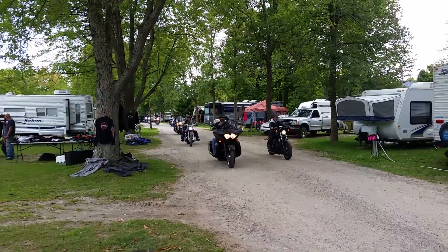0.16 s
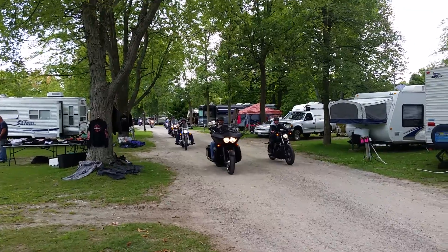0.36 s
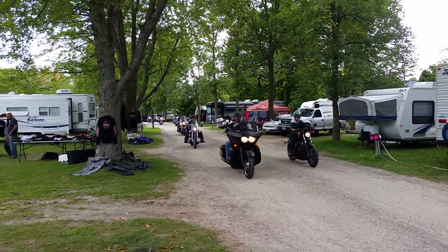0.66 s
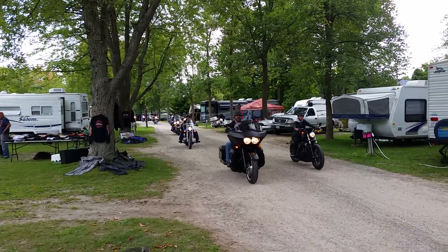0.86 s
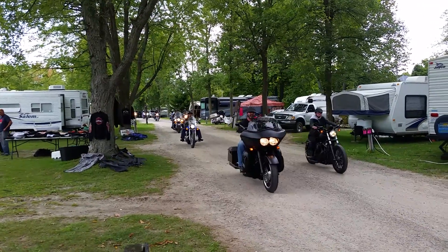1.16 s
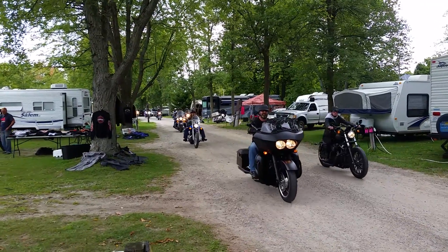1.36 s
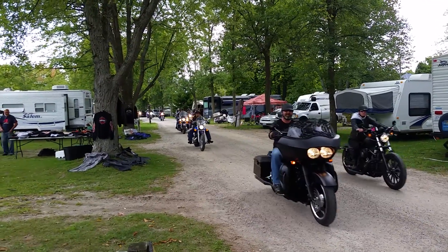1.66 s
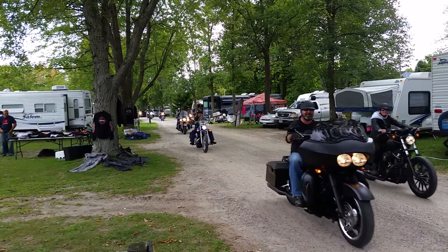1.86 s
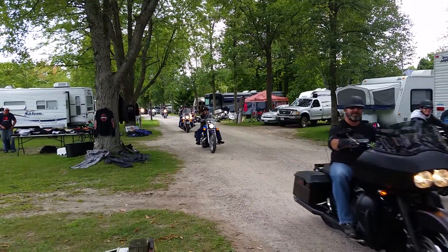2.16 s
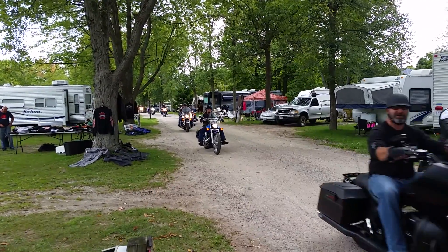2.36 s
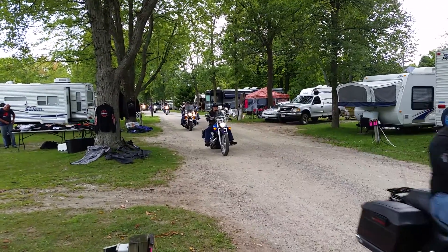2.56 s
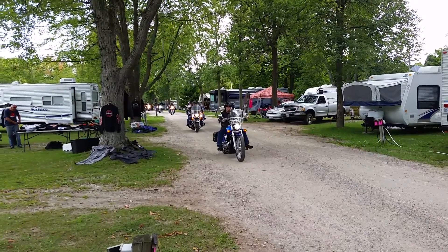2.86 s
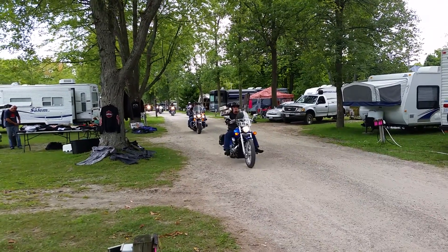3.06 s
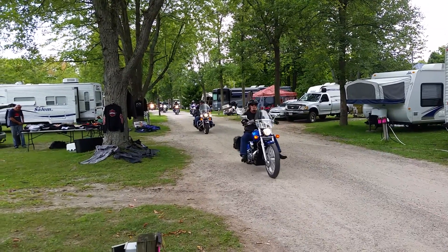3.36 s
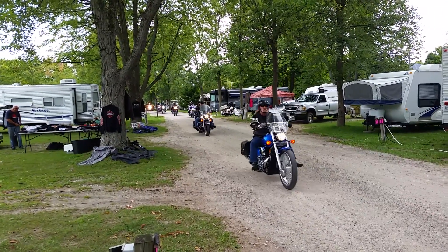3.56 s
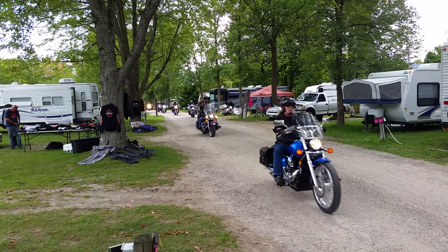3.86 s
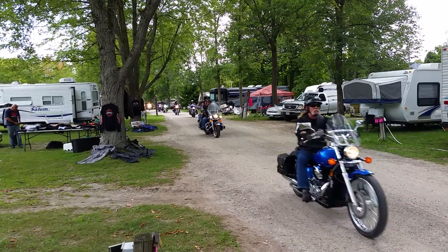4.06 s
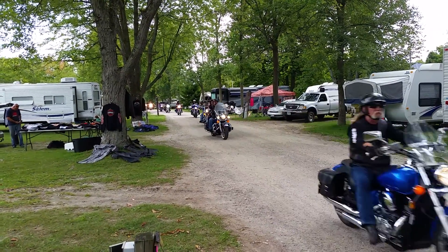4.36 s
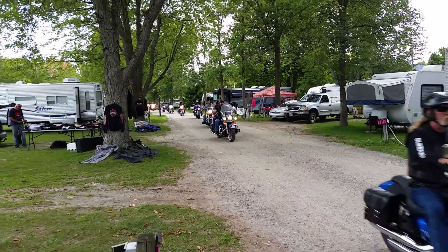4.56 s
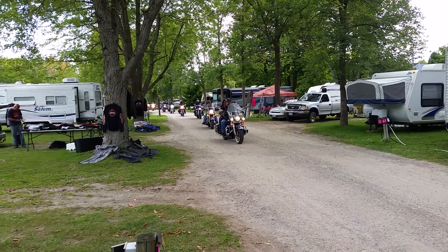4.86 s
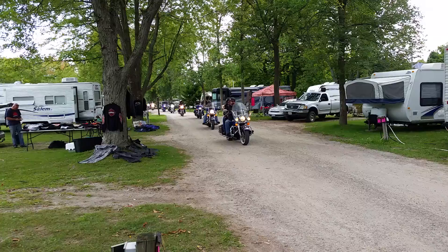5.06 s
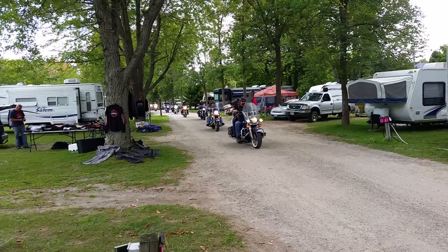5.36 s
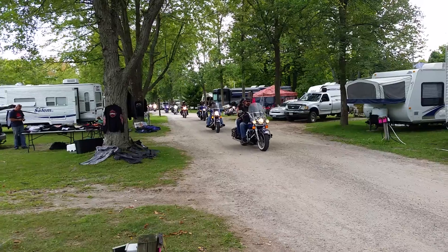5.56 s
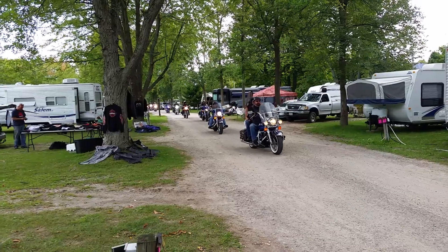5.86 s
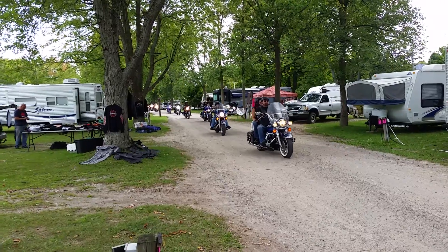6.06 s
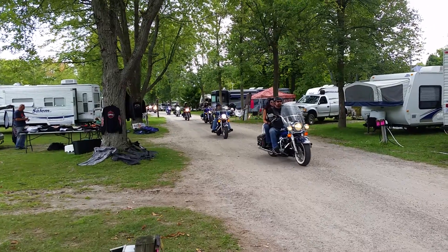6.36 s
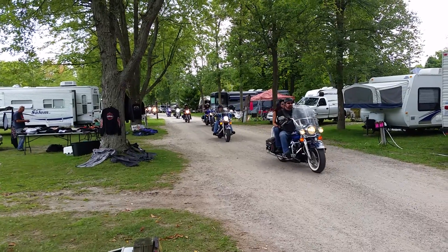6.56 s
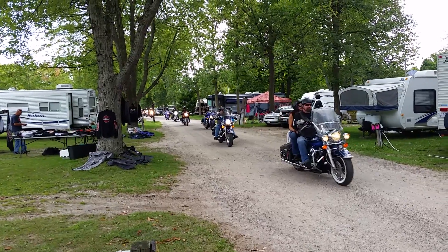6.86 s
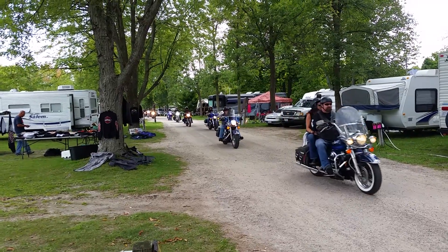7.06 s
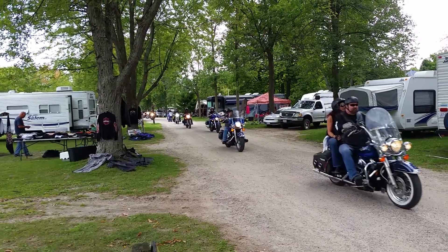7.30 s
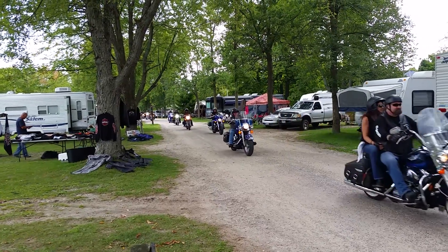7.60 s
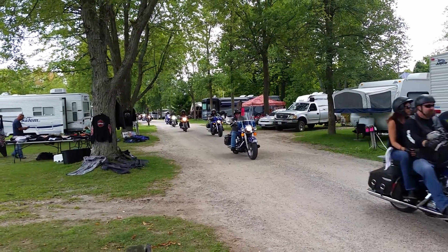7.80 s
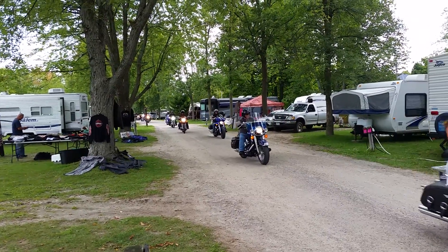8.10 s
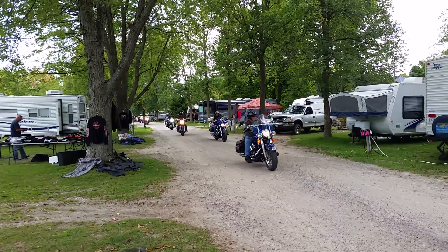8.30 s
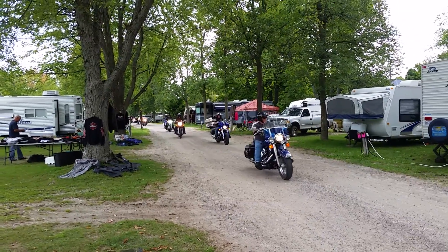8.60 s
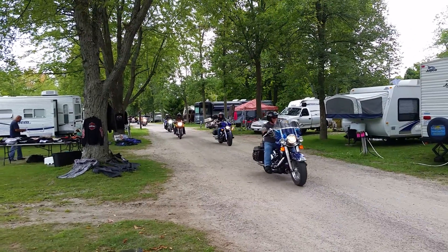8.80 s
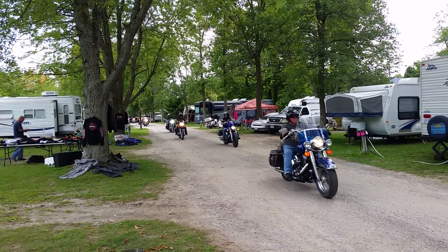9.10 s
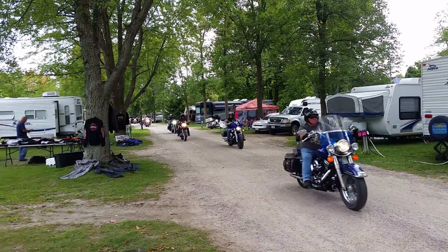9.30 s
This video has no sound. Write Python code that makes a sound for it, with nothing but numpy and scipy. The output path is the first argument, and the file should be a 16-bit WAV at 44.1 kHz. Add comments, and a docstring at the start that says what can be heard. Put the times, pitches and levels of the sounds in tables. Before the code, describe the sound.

A stereo microphone stands close beside a gravel lane outdoors as a column of big twin-cylinder motorcycles rolls slowly past. From 0 s, thick overlapping rumble: uneven paired exhaust beats, about twenty a second, with deep thumps, dull crankcase knocks, muffler barks and clatter. The beats weaken and skip around 2 to 2.6 s, with a short bark at 2.6 s. From 2.8 s the nearest bike grows strong, its puffs loudest and sharpest around 3 to 4.5 s. Then the bass drops as it goes away, leaving crisp, spitting, whistling chuffs with missed beats until about 6.3 s. A quieter lull follows near 6.7 s. From 7 s the next bike approaches, thumps and hard knocks building, extra barks near 8 s, full rumble to 9.4 s. Distant engines drone low throughout, with faint gravel hiss and short echoes.

```python
"""Gravel lane: a column of big twin-cylinder motorcycles rolls slowly past the listener.
Whichever bike is nearest, first one and then the next, chuffs unevenly with weak or skipped beats: noise
puffs, barks, knocks, header rings. A duller bike knocks beside it, others thump just behind; every blow rings
a filter shaped as a pipe. Twin-cylinder clicks at several rates make the rest of the column and pulse its
growl, knock, clatter and tyre hiss over a steady low roar; extra engine barks and knocks ring briefly."""
import sys
import numpy as np
from scipy import signal
from scipy.fft import rfft, irfft
from scipy.io import wavfile
from scipy.ndimage import uniform_filter1d

SR = 44100
rng = np.random.default_rng(int(sys.argv[2]) if len(sys.argv) > 2 else 0)


def master(y):
    """Save y as 16-bit WAV."""
    cut = np.clip(np.atleast_2d(y).T, -1, 1)
    pcm = np.round(cut * 32767)  # scale
    wavfile.write(sys.argv[1], SR, pcm.astype(np.int16))


N = 416304
T = np.arange(N) / SR
TWIN_GAP = 315 / 720  # short firing gap as a share of the engine cycle
BIKE_SPREAD_DB = 2.5  # chance change from beat to beat, bikes beside and behind
PEAK_DELAY_S = .003  # per-beat pitches are reached this long after the beat

# The column. Each row: time in seconds, thump in relative dB, treble in dB, knock pitch in Hz, growl in dB.
COLUMN = [(0, -13.5, -39, 710, -36.5), (.45, -9.5, -35, 750, -39.5), (1.1, -10.5, -36, 750, -32.5),
          (1.5, -12, -39.5, 657, -39), (2.3, -12.5, -41, 650, -33.5), (2.75, -12, -40.5, 718, -31.5),
          (3.5, -15.5, -40.5, 774.7, -37), (4.1, -20, -54, 556, -30.5), (4.5, -17.5, -57, 642.7, -33.5),
          (5, -20, -49, 675, -41), (5.7, -21, -48, 670, -39.5), (6.08, -19.5, -42, 625, -38),
          (6.3, -21.5, -45.5, 640, -44), (6.86, -17, -43.5, 636, -38.5), (7.3, -12.5, -40, 633, -32.5),
          (8, -10.5, -38, 644.5, -37.5), (8.7, -12, -39, 696, -36.5), (9.44, -12, -42, 654, -35)]
# Exhaust thump spectra of the bikes coming, the bike going away, the next group.
# Each row: frequency in Hz, density in relative dB per Hz.
PIPE_SPECTRA = [
    [(15, -62), (25, -41), (47, -10), (83, -1.5), (102, 1.5), (139, -2.5), (221, -15.5), (285, -19.5),
     (403, -40.5), (505, -51), (600, -32), (780, -79), (1320, -120)],
    [(15, -62), (25, -64), (43, -11), (74, -1), (97, 2.5), (122, -1), (145, -5.5), (172, -7.5),
     (263, -13.5), (305, -30), (377, -27), (600, -41.5), (780, -68), (1320, -120)],
    [(15, -30), (25, -50), (54, -1.5), (75, 0.5), (100, 4.5), (130, -3), (227, -13), (267, -11.5),
     (387, -37.5), (518, -51), (600, -27.5), (780, -76), (1320, -120)],
]
# Muffler shell spectrum. Each row: frequency in Hz, density in relative dB per Hz.
BARK_SPECTRUM = [(1200, -37), (1700, 2.5), (2300, 1), (2800, 0.5), (3600, -16)]
# Crankcase spectrum. Each row: frequency in Hz, density in relative dB per Hz.
KNOCK_SPECTRUM = [(350, -4.5), (500, -4), (620, -6.5), (800, -4), (1000, -6), (1500, -2), (2000, -15.5)]


def gain_of(db):
    """Amplitude factor of a level in dB."""
    return 10 ** (np.asarray(db) / 20)


def evened(x):
    """Scales to rms 1, over all channels together."""
    return x / np.sqrt(np.mean(x ** 2) + 1e-20)


def read(points, hz):
    """Reads a frequency table, linear in log frequency."""
    table_hz, value = np.transpose(points)
    return np.interp(np.log(hz + 1), np.log(table_hz + 1), value)


def along(rows, t=T):
    """Reads the columns of a time table, linear in time."""
    s, *columns = np.transpose(rows)
    return [np.interp(t, s, column) for column in columns]


def coloured(points):
    """Two unrelated noises with the given spectrum."""
    spectrum = rfft(rng.standard_normal((2, N)))
    gain = gain_of(read(points, np.fft.rfftfreq(N, 1 / SR)))
    return evened(irfft(spectrum * gain, N))


def resonate(x, hz, width_hz):
    """Shifts the curve hz down to zero, smooths, and shifts back: a click rings at height 1."""
    turn = np.exp(2j * np.pi * np.cumsum(hz) / SR)
    decay = np.exp(-np.pi * width_hz / SR)
    return (turn * signal.lfilter([1], [1, -decay], x / turn)).real


def burst(rise_s, fall_s, tail_db, tail_s):
    """Envelope of escaping gas: quick swell, quick fall, a weaker trail."""
    t = np.arange(3000) / SR
    late = np.maximum(t - rise_s, 0)
    fall = np.exp(-late / fall_s) + gain_of(tail_db) * np.exp(-late / tail_s)
    return np.minimum(t / rise_s, 1) ** 2 * fall


def train(s, size):
    """Clicks of the given sizes at the given times."""
    at = np.round(s * SR).astype(int)
    keep = (at >= 0) & (at < N)
    return np.bincount(at[keep], size[keep], N)


def twin(rate, uneven_db, wander, gap=TWIN_GAP):
    """Firing clicks of a twin: a short gap, then a long one, each of its own strength."""
    drift = evened(uniform_filter1d(uniform_filter1d(rng.standard_normal(N), 9000), 9000))
    cycles = np.cumsum(rate * (1 + wander * drift)) / (2 * SR) + rng.random()  # two beats a cycle
    first = np.diff(np.floor(cycles), prepend=0) > 0
    second = np.diff(np.floor(cycles - gap), prepend=-1) > 0
    return evened((first | second) * gain_of(uneven_db * rng.standard_normal(N)))


def steady(noise):
    """Noise with its slower chance swells taken out."""
    stroke_s = .005  # within this span a gust keeps an even strength
    power = abs(uniform_filter1d(noise ** 2, size=round(stroke_s * SR)))
    return noise / np.sqrt(power + 1e-3)


def gusts(noise, s, db, shape):
    """Noise let through by one envelope at each beat."""
    return steady(noise) * signal.oaconvolve(train(s - .0015, gain_of(db)), shape)[:N]


def ports(pair, likeness, size=256):
    """Right port hears the first sound; the left hears it later, mixed with the second, through the housing."""
    # Each row: time in seconds, full lag of the left port in ms.
    lag = [(0, 0.036), (2.8, 0.32), (3.6, 0.6), (5, 0.35), (5.7, 0.41), (6.1, 0.13), (6.7, 0.16),
           (7.3, 0.29), (8.2, 0.35), (9.44, 0.58)]
    # Bass bends round the housing. Each row: frequency in Hz, share of the full lag.
    lag_share = [(100, 0.25), (500, 0.55), (1000, 0.48), (2000, 0.79)]
    # Each row: frequency in Hz, left minus right in dB.
    port_tilt = [(60, 0), (200, 0), (380, 0.6), (700, 0), (1290, 5), (2380, 8), (4400, -2), (8120, -1),
                 (15000, -2)]
    # Each row: frequency in Hz, left-right likeness (0 to 1) when the likeness argument is 1.
    base_likeness = [(60, 0.97), (130, 0.99), (300, 0.92), (700, 0.95), (1500, 0.64), (2500, 0.64),
                     (4500, 0.28), (15000, 0.17)]
    overlap = size * 3 // 4
    hz, t, (a, b) = signal.stft(pair, SR, nperseg=size, noverlap=overlap)
    same = np.clip(read(base_likeness, hz)[:, None], 0, 1) ** (1 / likeness)
    lag_s = along(lag, t)[0] / 1000
    late = np.exp(-2j * np.pi * (hz * read(lag_share, hz))[:, None] * lag_s)
    tilt = gain_of(read(port_tilt, hz)[:, None] / 2)
    left = (same * a * late + np.sqrt(1 - same ** 2) * b) * tilt
    right = a / tilt
    return signal.istft([left, right], SR, nperseg=size, noverlap=overlap)[1][:, :N]


def spit(shift=1):
    """Edge noise of the gas jet, strongest around its moving peak."""
    # Each row: frequency in Hz, density in relative dB per Hz.
    edge_spectrum = [(6500, -14), (8300, 1), (9200, 4.5), (12200, 6), (14000, 4), (16000, 9)]
    # Its moving peak. Each row: time in seconds, frequency in Hz before any shift.
    edge_peak = [(0, 11900), (.8, 13300), (2.6, 11700), (3.7, 12500), (5.7, 12400), (7.2, 10900),
                 (9.44, 8900)]
    noise = coloured(edge_spectrum)
    peak = evened(resonate(noise, shift * along(edge_peak)[0], 2400))
    return evened(noise + 0.96 * peak)


def column():
    """Several engines at their own speeds; their beats also pulse the growl, knock, clatter and hiss."""
    # Beats per second of each engine.
    engine_rates = [14.5, 16.7, 21]
    # Knock law: knock in dB at a thump of loud_db, then knock dB per dB of thump.
    knock_law = (-36.5, 1.05)
    # Upper pipe ring. Each row: frequency in Hz, density in relative dB per Hz.
    growl_spectrum = [(240, -49), (300, 5.5), (380, 3), (480, -6.5), (600, -24)]
    # Tyres on gravel. Each row: frequency in Hz, density in relative dB per Hz.
    hiss_spectrum = [(2200, -66), (3000, 3.5), (4400, 0.5), (5700, -6), (7000, -0.5), (9000, -7),
                     (12000, -29)]
    # Engine clatter. Each row: time in seconds, level in dB.
    clatter_level = [(0, -40.5), (.5, -38), (1.1, -36.5), (1.6, -34.5), (2.2, -36), (2.7, -34), (3.3, -39),
                     (3.8, -43), (4.2, -42), (4.7, -42.5), (5.3, -42.5), (5.8, -46), (6.3, -51.5),
                     (6.8, -45.5), (7.3, -38.5), (8, -38), (8.6, -36.5), (9.1, -38), (9.44, -41)]
    loud_db = -16
    fizz_db = 0.5  # re treble
    far_blows_db = -6  # single blows re the column's thump
    casing_hz, casing_width_hz = 2130, 1070
    pass_s, pass_span_s, pass_hz, pass_width_hz, pass_db = 4.2, 0.16, 520, 310, -40

    thump_db, treble_db, knock_hz, growl_db = along(COLUMN)
    knock_db = knock_law[0] + knock_law[1] * (thump_db - loud_db)
    fires = sum(twin(rate, 1.5, .006) for rate in engine_rates)
    throb = evened(signal.oaconvolve(fires, burst(0.0026, 0.003, -0.87, 0.027))[:N])
    throb = np.minimum(throb, 1.8)  # beats that fall together do not pile up

    case = coloured(KNOCK_SPECTRUM)
    case = case + 1.53 * evened(resonate(case, knock_hz, 315))
    out = gain_of(knock_db) * evened(case * (0.57 + throb))
    # a quiet bike hums as it goes by
    hum = evened(resonate(rng.standard_normal((2, N)), np.full(N, pass_hz), pass_width_hz))
    out += gain_of(pass_db) * np.exp(-((T - pass_s) / pass_span_s) ** 2) * hum
    out += gain_of(growl_db) * evened(coloured(growl_spectrum) * (0.15 + throb))
    clatter = coloured(BARK_SPECTRUM)
    casings = evened(resonate(clatter, np.full(N, casing_hz), casing_width_hz))
    clatter = clatter + 0.55 * casings
    out += gain_of(along(clatter_level)[0]) * evened(clatter * (3.9 + throb))
    out += gain_of(treble_db) * evened(coloured(hiss_spectrum) * (1.7 + throb))
    out += gain_of(treble_db + fizz_db) * evened(spit() * (2.5 + throb))
    return ports(out, likeness=0.51), gain_of(thump_db + far_blows_db) * evened(fires)


def far_drone():
    """The many distant engines blur into one steady low roar."""
    drone_db = -5  # re the column's thump
    roar = ports(coloured(PIPE_SPECTRA[0]), likeness=2.7, size=2048)
    return gain_of(along(COLUMN)[0] + drone_db) * roar


def thump(points):
    """Causal answer of a pipe to one blow, energy 1; the pressure dips first."""
    size = 2 ** 15
    level_db = np.maximum(read(points, abs(np.fft.fftfreq(size, 1 / SR))), -100)
    log_gain = np.log(gain_of(level_db))
    # minimum phase from the log gain
    shape = np.fft.ifft(np.exp(np.conj(signal.hilbert(log_gain)))).real[:6000]
    return -shape / np.linalg.norm(shape)


def yard(x):
    """Ground, trees and trailers return sparse echoes; two unrelated sets."""
    taps = rng.choice([-1., 1.], (2, 9000)) * (rng.random((2, 9000)) < .03)
    taps *= gain_of(-60 * np.arange(9000) / SR / 0.3)  # 60 dB down in 0.3 s
    taps /= np.linalg.norm(taps, axis=1)[:, None]
    return signal.oaconvolve(x[None], taps, axes=1)[:, :N]


def pipes(clicks, echo_db):
    """Blows ring the pipe of their moment; the echoes of the yard change as the bikes roll on."""
    # Times in seconds at which the next pipe takes over.
    pipe_changes = [3.4, 6.8]
    which = np.searchsorted(pipe_changes, T + .25 * rng.standard_normal(N))  # chance blends the handover
    place = np.floor(T * 3) % 3  # three echo sets in turn, a third of a second each
    out = 0
    for k, points in enumerate(PIPE_SPECTRA):
        for spot in range(3):
            blows = signal.oaconvolve(clicks * (which == k) * (place == spot), thump(points))[:N]
            echoes = yard(blows)
            out = out + np.array([blows + gain_of(echo_db) * echoes[0], echoes[1]])
    return ports(out, likeness=1.74, size=2048)


def knocks(s, db):
    """Each beat rings the crankcase and shakes noise out of it."""
    ring = resonate(train(s + 0.002, gain_of(db + 7.5)), along(COLUMN)[2], 60)
    return ring + gusts(coloured(KNOCK_SPECTRUM), s, db, burst(.003, .005, -6, .014))


def other_bikes():
    """Duller beats alongside: mostly thump and knock, some bark."""
    # The bike while far. Each row: time in seconds, beats per second, mean knock in dB.
    beside_far = [(0, 17.1, -38), (1.3, 20.4, -47), (2.7, 19.6, -44), (4, 14.14, -60), (6.5, 17, -49.5),
                  (7.4, 21.4, -40)]
    # Once close, its clear front-cylinder knocks. Each row: time in seconds, knock in dB.
    front_knocks = [(7.443, -35), (7.554, -39), (7.65, -40), (7.74, -39), (7.833, -41), (7.924, -34),
                    (8.019, -34), (8.114, -31), (8.213, -46), (8.323, -31), (8.407, -31), (8.505, -33),
                    (8.598, -29), (8.69, -30.5), (8.781, -39), (8.869, -33), (8.956, -33), (9.044, -32),
                    (9.131, -29), (9.22, -31), (9.308, -30), (9.396, -36)]
    # Each row: time in seconds, mean thump in dB.
    beside_thump = [(0, 6), (1.3, 13), (2.7, 14.5), (4, 6.5), (6.5, 8), (7.4, 13.5), (8.3, 14), (9, 16),
                    (9.44, 22)]
    rear_knock_db = -9.5  # rear cylinder re the front
    beside_bark_db = -14  # mean bark re knock

    front, front_db = np.transpose(front_knocks)
    far = np.flatnonzero(twin(along(beside_far)[0], 0, .004, gap=.47)) / SR
    far = far[far < front[0] - .03]
    rear = front[:-1] + TWIN_GAP * np.diff(front)
    s = np.concatenate([front, rear, far])
    luck_db = BIKE_SPREAD_DB * rng.standard_normal((len(s), 3))
    thump_db = along(beside_thump, s)[0] + luck_db[:, 0]
    far_db = along(beside_far, far)[1] + luck_db[-len(far):, 1]
    knock_db = np.concatenate([front_db, front_db[:-1] + rear_knock_db, far_db])
    bark_db = knock_db + beside_bark_db + luck_db[:, 2]
    out = knocks(s, knock_db)
    out = out + gusts(coloured(BARK_SPECTRUM), s, bark_db, burst(0.002, 0.011, -35, 0.017))
    return ports(out, likeness=1.0), train(s + .001, gain_of(thump_db))


def bikes_behind():
    """Strong single thumps, each with a dull knock and a little bark."""
    # Each row: time in seconds, thump in dB.
    thumps = [(0.0262, 15.4), (0.0419, 18.2), (0.0743, 18.4), (0.1043, 16.1), (0.2605, 18.2),
              (0.3214, 16.3), (0.3505, 20.3), (0.4543, 16.5), (0.47, 16.9), (0.6314, 18.3), (0.6695, 18.8),
              (0.6895, 19.8), (0.7329, 21.6), (0.771, 22.5), (0.7914, 19.0), (0.8333, 20.4), (0.9671, 18.6),
              (0.9814, 18.9), (1.07, 20.6), (1.1519, 17.4), (1.2771, 18.8), (1.3686, 21.0), (1.4771, 19.9),
              (1.5043, 18.9), (1.5352, 19.7), (1.5667, 22.1), (1.6414, 19.4), (1.6824, 20.7),
              (1.7476, 18.5), (1.7962, 17.2), (1.851, 17.3), (1.9167, 19.2), (1.9671, 20.4), (2.0233, 18.5),
              (2.0648, 18.4), (2.1024, 20.6), (2.12, 19.3), (2.1438, 18.4), (2.1871, 18.7), (2.2195, 19.4),
              (2.2805, 19.9), (2.319, 18.7), (2.4586, 19.2), (2.5357, 21.3), (2.5795, 21.0), (2.6676, 22.4),
              (2.7014, 22.4), (2.7338, 18.7), (2.7938, 20.0), (2.8495, 18.0), (2.9371, 19.9),
              (2.9533, 19.4), (3.069, 18.0), (3.1019, 18.5), (3.2538, 19.7), (3.3386, 19.3), (3.3738, 16.6),
              (3.4062, 18.0), (3.59, 17.6), (3.7381, 13.1), (3.8414, 12.1), (3.9033, 14.8), (3.9367, 11.9),
              (4.091, 13.9), (4.1671, 12.2), (4.2614, 12.1), (4.301, 9.8), (4.3243, 9.9), (4.3981, 10.6),
              (4.459, 13.3), (4.5138, 13.9), (4.5448, 11.2), (4.5719, 11.2), (4.629, 13.2), (4.6671, 11.9),
              (4.7029, 11.6), (4.7224, 10.8), (4.761, 9.4), (4.8676, 10.4), (4.9633, 13.3), (5.0219, 9.0),
              (5.061, 11.0), (5.1348, 10.2), (5.1667, 8.9), (5.3671, 11.1), (5.4686, 13.5), (5.4881, 10.1),
              (5.5676, 9.1), (5.6376, 10.5), (5.681, 9.2), (5.7281, 9.7), (5.8414, 12.8), (5.94, 17.2),
              (6.0286, 10.4), (6.0614, 16.5), (6.079, 12.3), (6.1929, 10.7), (6.2148, 12.3), (6.2419, 12.0),
              (6.28, 11.3), (6.2933, 11.0), (6.3557, 12.2), (6.4033, 12.1), (6.4486, 10.2), (6.5119, 14.5),
              (6.56, 13.7), (6.6124, 10.7), (6.6524, 14.4), (6.7781, 12.3), (6.8381, 14.4), (6.8995, 14.0),
              (6.9424, 15.2), (6.9733, 13.3), (6.9962, 15.9), (7.069, 16.9), (7.1162, 16.0), (7.1367, 18.8),
              (7.169, 19.1), (7.2367, 17.8), (7.2857, 17.1), (7.3481, 17.3), (7.3781, 19.5), (7.4195, 18.3),
              (7.4714, 19.2), (7.4843, 16.3), (7.5343, 19.2), (7.5738, 21.5), (7.6462, 17.5),
              (7.7452, 18.1), (7.7967, 16.2), (7.8267, 18.8), (7.8562, 16.7), (7.9195, 17.6), (7.951, 16.2),
              (8.0133, 20.8), (8.0571, 20.1), (8.1071, 19.9), (8.2371, 21.9), (8.3033, 17.9),
              (8.3605, 20.1), (8.6452, 17.8), (8.7062, 19.6), (8.7957, 20.7), (8.8838, 18.6), (8.981, 18.0),
              (9.1138, 17.5), (9.1557, 20.3), (9.311, 20.7), (9.3233, 19.6), (9.3586, 18.4)]
    thump_knock_db, thump_bark_db = -57.5, -63  # means re thump
    s, db = np.transpose(thumps)
    luck_db = BIKE_SPREAD_DB * rng.standard_normal((len(s), 2))
    knock_db = db + thump_knock_db + luck_db[:, 0]
    bark_db = db + thump_bark_db + luck_db[:, 1]
    out = gusts(coloured(KNOCK_SPECTRUM), s, knock_db, burst(0.0042, 0.0095, -8, 0.021))
    out += gusts(coloured(BARK_SPECTRUM), s, bark_db, burst(.002, 0.0061, -10, .012))
    return ports(out, likeness=1.0), train(s, gain_of(db))


def puffs(noise, s, db):
    """Gusts with slap echoes, whose shape changes from one stretch of the pass to the next."""
    # Each row: start in seconds, swell in s, fall in s, trail in dB, trail fall in s, echo in dB re puff.
    puff_shapes = [(0, 0.0037, 0.0032, -3, .007, -25), (2.75, .0035, 0.0033, -2.5, 0.0053, -23),
                   (4.3, 0.0027, 0.002, -8.5, 0.0029, -11.5), (6.9, 0.0041, 0.0036, -5.5, 0.0086, -20)]
    # Nearest trailer and trees. Each row: delay in seconds, level in dB re the echo level above.
    slap_echoes = [(.006, -1), (.021, -12)]
    lead_s = 0.00079
    which = np.searchsorted([row[0] for row in puff_shapes[1:]], s)
    level = 0
    for k, (_, rise_s, fall_s, tail_db, tail_s, echo_db) in enumerate(puff_shapes):
        at = s[which == k] - lead_s - .0015
        size = gain_of(db[which == k])
        clicks = train(at, size)
        for delay_s, slap_db in slap_echoes:
            clicks = clicks + train(at + delay_s, size * gain_of(echo_db + slap_db))
        level = level + signal.oaconvolve(clicks, burst(rise_s, fall_s, tail_db, tail_s))[:N]
    return steady(noise) * level


def nearest_bike():
    """Each beat blows a puff of gas, barks in the muffler, knocks in the case; also gives the pipe blows."""
    # Exhaust beats of whichever bike is nearest, weak or missing where it misfires. Each row: time in seconds,
    # nominal puff peak in dB, spit in dB, bark in dB, knock in dB, whistle in Hz.
    beats = [(0.0838, -16, -44, -24, -39, 2930), (0.1263, -12, -37, -30, -31, 2910),
             (0.189, -24.0, -38, -27, -35, 2950), (0.2367, -24, -39, -37, -33, 3210),
             (0.299, -26, -43, -29, -31, 3360), (0.342, -22.0, -37, -39, -29, 2910),
             (0.403, -17, -35, -23, -30, 3300), (0.4474, -22, -35, -26, -26, 2910),
             (0.5086, -16, -33, -28.5, -34, 3320), (0.5496, -17, -27, -30, -34, 4360),
             (0.61, -18, -30.5, -21.5, -27, 3420), (0.652, -13, -28, -33, -25.5, 4100),
             (0.7091, -13, -31, -24.5, -28, 2880), (0.752, -33, -29, -33.0, -28, 3940),
             (0.809, -17, -30, -27, -28, 2990), (0.853, -20, -26, -39, -29, 3210),
             (0.907, -15, -34, -21, -25, 2930), (0.9479, -21, -29, -32, -28, 3340),
             (1.008, -14, -30.0, -24, -33, 3040), (1.046, -11, -24, -30, -24, 2970),
             (1.102, -14, -26, -23, -29, 4870), (1.146, -27, -43, -49, -47, 2930),
             (1.202, -17, -36.0, -31.0, -37, 2910), (1.245, -29.0, -46, -36.5, -38.0, 3320),
             (1.3025, -16, -30, -25.5, -28.5, 3600), (1.3499, -11, -20.5, -25.5, -28, 2910),
             (1.409, -15, -37, -25.5, -46, 2930), (1.449, -26, -43.5, -31, -48, 3060),
             (1.512, -10, -25, -25, -41, 3060), (1.555, -27.5, -40, -35, -32.0, 3700),
             (1.6191, -13, -32, -25, -35, 3020), (1.665, -15, -26, -32, -34, 2950),
             (1.7271, -18, -30, -38, -34, 2910), (1.78, -31, -43.0, -40, -39, 3420),
             (1.8354, -21.5, -31, -37, -42, 2950), (1.8827, -15, -25.5, -28, -38, 4070),
             (1.94, -23, -33, -39, -44, 3730), (1.99, -34, -40.0, -37, -44, 3790),
             (2.0505, -14, -30, -30.5, -36, 3040), (2.095, -30.0, -40.0, -31, -41, 3680),
             (2.156, -32, -43.5, -32, -35, 2930), (2.2007, -20, -33.0, -33, -31, 6700),
             (2.256, -27.0, -34, -46, -33, 3170), (2.305, -41, -43, -42, -46, 3700),
             (2.361, -30, -45, -32, -42, 3120), (2.409, -31.5, -52, -35, -34, 2930),
             (2.4655, -32, -47, -27, -34, 3060), (2.5111, -26, -44, -34, -37, 3140),
             (2.567, -29, -46, -43, -47, 2910), (2.628, -34, -42, -35, -46, 2910),
             (2.678, -24, -42.5, -25, -43, 2910), (2.724, -20, -33, -25, -31, 2910),
             (2.781, -24, -34, -20.5, -31, 3530), (2.825, -24, -38, -24, -32, 3360),
             (2.883, -20, -37, -25, -32, 3030), (2.929, -29, -27, -25, -33.0, 2910),
             (2.9857, -14, -23.5, -20.5, -31, 3320), (3.0296, -11, -23, -23.5, -38, 5030),
             (3.0872, -8, -22, -19, -42, 3100), (3.1294, -8, -21.5, -19.5, -34.0, 2900),
             (3.1852, -8, -21.5, -17.5, -32, 3100), (3.229, -10, -22.5, -18.5, -44, 2940),
             (3.2852, -6.5, -18.5, -21, -42, 3180), (3.3278, -10, -18.5, -14.5, -28, 3640),
             (3.3834, -4.5, -21.5, -23, -39, 3200), (3.4242, -18, -24, -19, -41.5, 2910),
             (3.481, -8, -19, -18.5, -39, 3100), (3.5227, -8, -18, -21.5, -38, 5500),
             (3.5774, -9, -21, -19, -32, 2990), (3.617, -12, -20.5, -20.5, -41, 2940),
             (3.6737, -12.5, -20.5, -22, -38, 4500), (3.714, -20, -25, -22.5, -46, 5220),
             (3.771, -8, -21.5, -24.5, -50, 3700), (3.811, -15, -19, -22.5, -49, 4960),
             (3.8647, -9, -22.5, -28, -41, 3500), (3.9606, -10.5, -22.5, -26.5, -47, 3080),
             (4.0022, -8, -22, -27, -52, 4400), (4.056, -11, -19.5, -27, -41, 2910),
             (4.153, -13, -20, -25.5, -30, 3126), (4.1949, -8.5, -19, -26, -32, 2880),
             (4.2487, -11, -20, -29, -42, 3040), (4.339, -8.5, -18, -26.5, -43, 5500),
             (4.3799, -6, -12, -29, -53, 3370), (4.4317, -3.5, -22, -45, -40, 3530),
             (4.5219, -7, -25, -40, -44, 3500), (4.5618, -20, -24.5, -35, -37, 7240),
             (4.6162, -6.5, -21, -32, -49, 3600), (4.657, -9, -16.5, -29.5, -50, 3040),
             (4.71, -16, -24, -37, -40, 3940), (4.808, -11, -25, -29, -36.5, 4630),
             (4.9097, -7.5, -24, -33, -38, 4225), (4.9519, -8.5, -14, -30, -43, 4800),
             (5.0078, -11.5, -23, -36, -42.5, 4840), (5.11, -18, -24, -42, -52, 4740),
             (5.156, -12.5, -20.5, -35, -49, 3540), (5.214, -9.5, -18.5, -44, -39, 5000),
             (5.2578, -13, -23, -35, -48, 3730), (5.312, -16, -20.5, -35, -45, 4620),
             (5.4144, -10.5, -21, -43, -39, 4180), (5.457, -12, -19, -36, -43, 4160),
             (5.5123, -11, -21, -35, -37.0, 5330), (5.6128, -10.5, -19, -44, -34, 4250),
             (5.7161, -13.5, -23, -40, -38, 5060), (5.76, -6.5, -15, -44, -39, 3800),
             (5.816, -10, -19, -39, -35.5, 5100), (5.918, -12, -18, -35, -39, 4270),
             (5.9608, -5, -15, -43, -50, 3940), (6.0179, -10, -22, -34, -41, 6950),
             (6.123, -10, -21, -35, -49, 6900), (6.169, -11, -21.5, -46, -46, 4100),
             (6.2261, -13.5, -26, -40.0, -39.5, 6000), (6.33, -16, -29, -43, -39, 6050),
             (6.4313, -19, -34, -35, -36, 3210), (6.479, -15, -29, -37, -37.0, 4220),
             (6.5355, -20, -31, -41, -42, 3257), (6.682, -19, -25, -51, -47, 3900),
             (6.7419, -32, -37.5, -46, -38, 3550), (6.8442, -28, -40.5, -37.5, -31.5, 7060),
             (6.991, -39, -34, -46, -41, 2970), (7.0557, -28, -35, -33, -40, 4310),
             (7.098, -33, -37, -39, -38, 4200), (7.155, -21, -40, -32, -40, 4560),
             (7.2625, -31, -46, -41, -39, 4110), (7.3064, -24, -25.5, -28, -37, 6440),
             (7.5116, -20, -25.5, -30, -33, 7600), (7.6142, -28, -27.5, -30, -33, 2990),
             (7.6768, -34, -32.0, -35, -35, 3340), (7.7172, -34, -27, -34.0, -36, 4220),
             (7.778, -29, -27, -27, -31, 3060), (7.9844, -32, -35.0, -34.5, -42, 3420),
             (8.0308, -29.5, -27, -43, -33, 7490), (8.1139, -24, -18.5, -41, -31, 3490),
             (8.147, -35, -27, -37.0, -39, 2950), (8.2172, -21, -26.5, -46, -34, 3370),
             (8.3215, -21.0, -24.5, -41, -45, 4480), (8.354, -39, -24, -44, -39, 2970),
             (8.424, -26, -28, -36, -31.0, 4070), (8.4686, -32, -25, -37, -40, 3980),
             (8.5256, -30.0, -30, -45, -41, 3640), (8.5682, -33, -26, -44, -39.0, 3006),
             (8.6242, -26, -26, -34, -32, 6740), (8.6677, -22, -23, -38, -35, 3620),
             (8.7226, -27, -24.5, -37, -27, 6424), (8.768, -21, -26, -37.0, -38, 4370),
             (8.8229, -21, -27, -36, -43, 5430), (8.867, -17, -24, -31.5, -35, 4030),
             (8.9225, -15, -23.5, -34, -35, 7200), (8.965, -15.5, -26, -34, -35.0, 4400),
             (9.0207, -24.5, -27, -32, -33, 3010), (9.0638, -16, -28, -37, -36, 4800),
             (9.119, -18, -27, -31, -43, 6750), (9.1633, -13, -25, -26, -35.5, 4700),
             (9.215, -23.5, -26, -35, -37, 6400), (9.2563, -25, -32, -30, -40, 4520),
             (9.294, -27, -27, -36, -36, 2908)]
    # The first bike passes and goes away; from about 6.7 s another comes close.
    # Each row: time in seconds, mean thump in dB, mean left minus right in dB.
    near_level = [(0, 15.5, -0.5), (.8, 18, 0), (1.4, 13.5, 1.5), (2.1, 16.5, 3), (2.7, 16, -0.5),
                  (3.2, 20, -0.5), (3.7, 15, -4), (4.2, 15.5, -3.5), (4.5, 5.5, -4), (5.2, 3, -2.5),
                  (6, 10, -6), (6.6, -4, -0.5), (7.2, 13, -10), (8, 14, 0), (8.7, 21.5, -1), (9.44, 17, -6)]
    # Chance change from beat to beat in dB: thump, side.
    beat_spread_db = [1.5, 1.5]
    # Gas jet body. Each row: frequency in Hz, density in relative dB per Hz.
    puff_spectrum = [(2400, -3), (3000, 15.5), (3600, 16), (6000, 13.5), (7500, 11.5), (9000, -21)]
    # Strongest shell ring, sliding. Each row: time in seconds, mean frequency in Hz.
    bark_peak = [(0, 2310), (1.1, 2360), (2.7, 2490), (3.1, 2400), (3.4, 2530), (3.8, 2220), (4.1, 2450),
                 (4.4, 2820), (9.44, 2330)]
    # Header ring. Each row: time in seconds, mean level in dB.
    header_level = [(0, -15), (2.4, -26), (2.9, -14.5), (3.7, -11.5), (4.5, -21.5), (5.4, -21), (6.4, -21),
                    (7, -23.5), (9.44, -17.5)]
    crest_db = 16.5  # a puff of noise peaks this far above its rms
    rear_gap_s, rear_thump_db = .053, 1.5  # a beat this soon after the last is the rear cylinder's
    thump_follows = 0.1  # share of a puff's extra dB that the thump gets
    bark_wander, spit_wander = .08, .16  # share by which the peaks move from beat to beat
    header_hz, header_rise_s, header_fall_s = 265, .008, .007

    s, puff_db, spit_db, bark_db, knock_db, whistle_hz = np.transpose(beats)
    luck_db = rng.standard_normal((len(s), 2)) * beat_spread_db
    thump_db, pan_db = along(near_level, s) + luck_db.T
    rear = np.diff(s, prepend=-1) < rear_gap_s
    extra_db = puff_db - uniform_filter1d(puff_db, size=7)

    jet = coloured(puff_spectrum)
    # the pipe mouth whistles
    whistle = evened(resonate(jet, np.interp(T - PEAK_DELAY_S, s, whistle_hz), 210))
    out = puffs(evened(jet + 0.98 * whistle), s, puff_db - crest_db)

    bark_chance, spit_chance = rng.standard_normal((2, len(s)))
    bark_shift = 1 + bark_wander * np.interp(T - PEAK_DELAY_S, s, bark_chance)
    spit_shift = 1 + spit_wander * np.interp(T - PEAK_DELAY_S, s, spit_chance)
    out += puffs(spit(spit_shift), s, spit_db)
    shell = coloured(BARK_SPECTRUM)
    shell_ring = evened(resonate(shell, bark_shift * along(bark_peak)[0], 270))
    shell = evened(shell + 1.03 * shell_ring)
    out += gusts(shell, s, bark_db, burst(0.0031, 0.0057, -15.5, 0.026))
    out += knocks(s, knock_db)

    # the front cylinder's header pipe rings after each of its beats
    header = train(s, ~rear * gain_of(along(header_level, s)[0] + luck_db[:, 0]))
    swell = burst(header_rise_s, header_fall_s, -22.5, 0.046)
    header_ring = swell * np.sin(2 * np.pi * header_hz * T[:len(swell)])
    out += signal.oaconvolve(header, header_ring)[:N]

    lean = gain_of(.5 * np.interp(T, s, pan_db))
    blow_db = thump_db + rear_thump_db * rear + thump_follows * extra_db
    blows = train(s + 0.00083, gain_of(blow_db))
    return ports(out, likeness=1.06) * [lean, 1 / lean], blows


def engine_raps():
    """Extra engine barks and knocks: short noisy rings, each at its own pitch."""
    # Each row: time in seconds, nominal peak in dB, pitch in Hz.
    raps = [(1.181, -27, 867), (2.626, -9, 1070), (4.13, -14.5, 2230), (4.178, -18, 2270),
            (7.904, -10.5, 790), (8.059, -16, 887), (8.269, -33, 1052)]
    crest_db = 15.0  # peak above rms
    s, peak_db, hz = np.transpose(raps)
    pitch_hz = np.interp(T - PEAK_DELAY_S, s, hz)
    ring = evened(resonate(rng.standard_normal((2, N)), pitch_hz, 360))
    shape = burst(0.0034, 0.0035, -2.9, 0.007)
    return ports(gusts(ring, s, peak_db - crest_db, shape), likeness=2.3)


def scene():
    """Sums the bikes; the blows of all of them go through the pipes together."""
    rest, rest_blows = column()
    others, other_blows = other_bikes()
    behind, behind_blows = bikes_behind()
    near, near_blows = nearest_bike()
    blows = near_blows + other_blows + rest_blows + behind_blows
    return near + others + rest + behind + engine_raps() + far_drone() + pipes(blows, echo_db=-12)


def record(dry):
    """Bass roll-off, quick gain control on the loudest thumps, a soft ceiling, then the band limit."""
    edge_hz = 15900
    heard = signal.lfilter(*signal.butter(2, 18, "high", fs=SR), dry)
    power_db = 10 * np.log10(abs(uniform_filter1d((heard ** 2).mean(0), 700)) + 1e-12)
    excess_db = np.maximum(power_db + 7.5, 0)
    heard = heard / gain_of(0.99 * uniform_filter1d(excess_db, 400))
    soft = np.clip(1.4 * np.tanh(heard / 1.4), -.99, .99)
    band_limit = signal.firwin(255, edge_hz, window=("kaiser", 7), fs=SR)
    return signal.oaconvolve(soft, band_limit[None], "same")


dry = scene()
out = record(dry)
master(out)
```